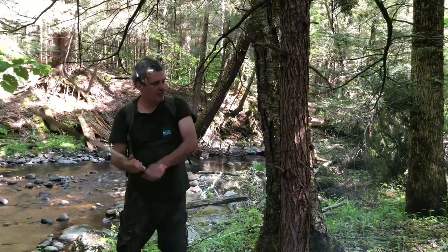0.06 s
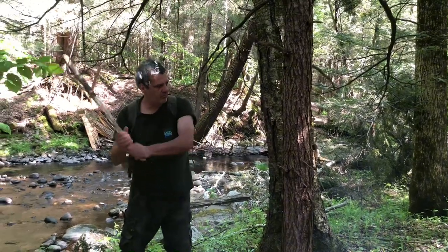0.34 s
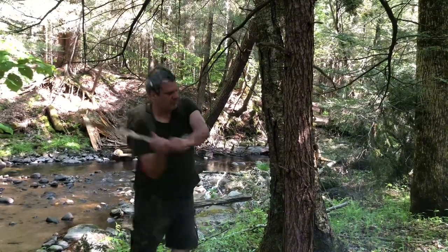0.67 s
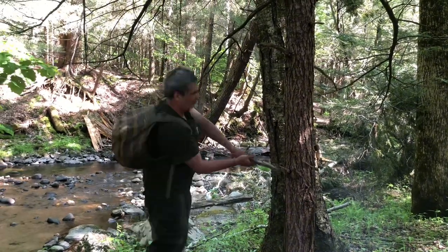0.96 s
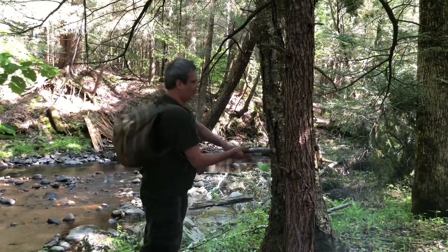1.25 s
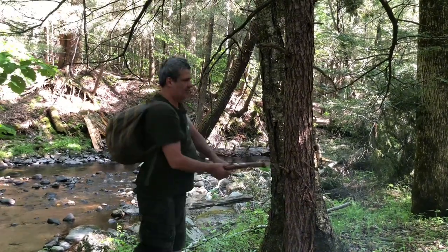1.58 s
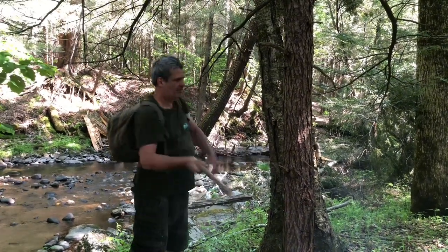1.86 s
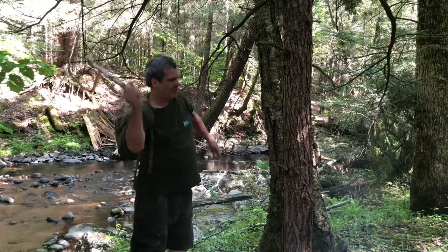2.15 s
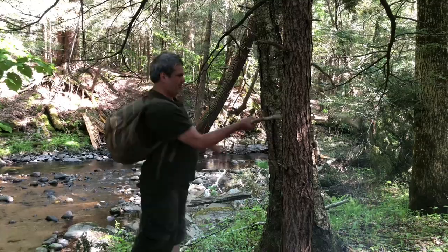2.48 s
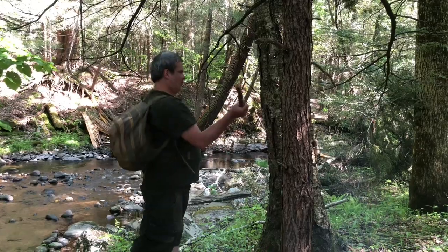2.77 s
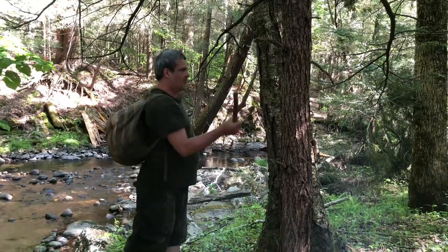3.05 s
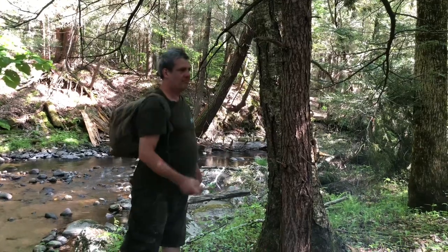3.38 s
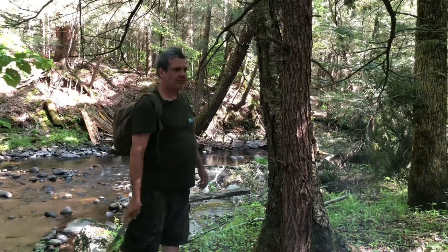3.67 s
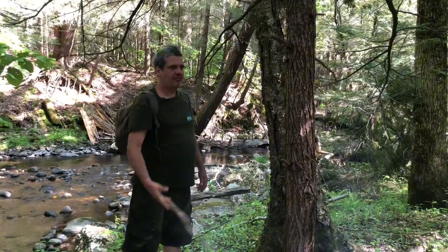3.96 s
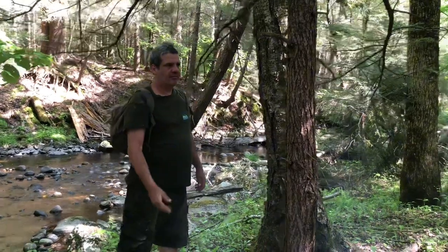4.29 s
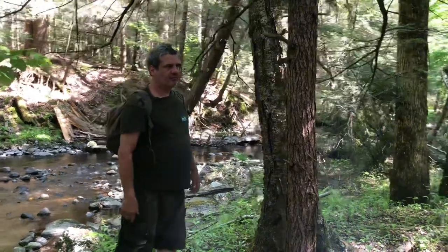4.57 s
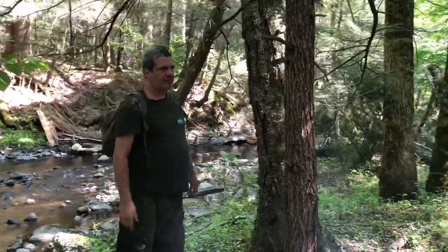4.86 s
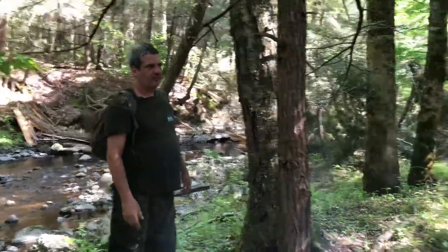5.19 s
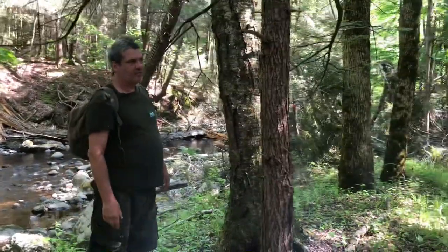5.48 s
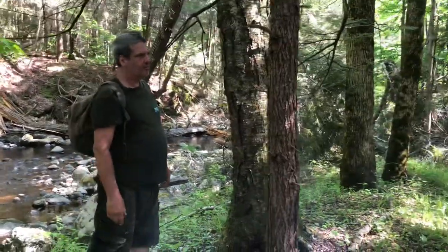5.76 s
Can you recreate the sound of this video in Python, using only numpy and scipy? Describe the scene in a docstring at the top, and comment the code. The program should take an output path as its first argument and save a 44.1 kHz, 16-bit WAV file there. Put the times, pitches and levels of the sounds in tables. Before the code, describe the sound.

Two sharp wooden knocks echo briefly in a forest, each followed by falling wood, while a stream trickles softly.

```python
"""Dead stick against a tree

A dead stick is swung twice against a trunk beside a small forest stream. Each blow cracks, rings
briefly and snaps a piece off, which lands in the leaf litter a moment later. The trunks scatter the
knocks back. Twigs and clothes rustle over a bed of ringing bubbles, watery wash and a far, low hum."""
import sys
import numpy as np
from scipy import signal
from scipy.fft import rfft, irfft, next_fast_len
from scipy.io import wavfile
from scipy.ndimage import uniform_filter1d

SR = 44100
rng = np.random.default_rng(int(sys.argv[2]) if len(sys.argv) > 2 else 0)


def to_wav(sig):
    """Store sig (one row per channel, or 1-D mono) as 16-bit WAV at the path in sys.argv[1].

    Samples outside -1..1 are clipped; the rate is SR.
    """
    pcm = np.clip(np.atleast_2d(sig), -1, 1) * 32767
    pcm = np.round(pcm).astype(np.int16)
    wavfile.write(sys.argv[1], SR, pcm.T)  # frames by channels


N = 257103
TIME = np.arange(N) / SR
LEAD = 64  # samples of soft start ahead of a crack

# Fader rides for the hum, the wash and the hiss. Each row: time in seconds, level in dB.
HUM_RIDE = [(0, -74.5), (1, -79.5), (2, -70), (3.8, -70.5), (5, -76.5), (5.83, -66.5)]
WASH_RIDE = [(0, -62.5), (.8, -63.5), (2.3, -60.5), (3.1, -61), (5.83, -61)]
HISS_RIDE = [(0, -65), (.7, -66.5), (1.7, -58), (2.1, -64), (3.1, -59), (3.9, -63), (5.1, -63.5),
             (5.83, -64.5)]
# Tone colours of the noisy layers. Each row: frequency in Hz, relative level in dB.
WASH_EQ = [(25, -27), (45, -2), (70, -10), (95, -4.5), (160, 1), (240, -2), (350, 0.5), (550, -1.5),
           (800, -1.5), (1400, 0), (2000, -4), (4000, -8), (9000, -37), (16000, -54)]
HISS_EQ = [(1500, -8), (3000, -1), (5000, 1.5), (8500, 0), (11000, -4), (16000, -11.5)]
CLOTH_EQ = [(800, -10), (2200, -2.5), (4000, -11), (6000, 1.5), (7500, 3.5), (10000, -8.5), (14000, -7),
            (16000, -15)]
LITTER_EQ = [(100, -8), (400, 3.5), (800, -6), (1500, -2.5), (2500, -4.5), (4000, -0.5), (6500, -1.5),
             (9000, -1.5), (12000, -5.5), (16000, -9.5)]
LONG_CRACK_EQ = [(100, -21), (800, -21), (1150, -31), (1530, -10), (1950, -21), (2420, 2), (2850, -9),
                 (3350, 1.5), (3900, -7.5), (4900, -1.5), (6000, -7.5), (8500, -9), (11500, -11.5),
                 (16000, -23)]
SHORT_CRACK_EQ = [(100, -33), (700, -9.5), (1300, -7), (1900, -4.5), (2600, -14.5), (3150, 1), (4400, -9.5),
                  (5900, 5.5), (7000, 0.5), (9000, -6), (11400, -5), (16000, -11)]
# The stream's big air pockets. Each row: peak in seconds, level in dB, pitch in Hz, relative splash in dB.
BIG_GURGLES = [(.325, -54, 520, -3), (.851, -54, 467, -5), (1.808, -55, 560, -7), (1.951, -50, 650, 0),
               (3.258, -47.5, 485, -8), (3.633, -46, 610, -7), (3.872, -53, 524, -4), (4.629, -53, 570, -1),
               (4.53, -55.5, 557, -4), (4.912, -50, 510, -4), (5.012, -48.5, 635, -11),
               (5.29, -52.5, 543, 3)]
# Colour of the forest's echo. Each row: frequency in Hz, level in dB.
ECHO_EQ = [(100, -20), (400, -11.5), (800, -7.5), (1000, -8.5), (1350, -7), (1900, -8), (2400, -18.5),
           (3100, -10), (4000, -10.5), (6000, -9), (9000, -9), (15000, -15)]
# Length of its tail. Each row: frequency in Hz, seconds to fall by 60 dB.
ECHO_T60 = [(100, 0.33), (800, 1), (3000, 0.95), (6000, 0.76), (10000, 0.64), (16000, 0.57)]
# Its bloom, slowest in the bass. Each row: frequency in Hz, rise in seconds.
ECHO_RISE = [(200, 0.042), (1400, .04), (3000, 0.022), (8000, 0.0077)]
# Feet and clothes shift. Each row: peak in seconds, level in dB, decay in seconds, tilt in dB per octave.
SHUFFLES = [(1.892, -49.5, .005, 9), (3.15, -50, 0.023, 2), (3.233, -46.5, 0.014, 0.5),
            (3.575, -52, 0.0097, -2.5), (3.93, -57.5, 0.04, 1.5), (3.999, -51, .006, 0),
            (4.389, -39, 0.0067, -1), (4.581, -44, 0.0042, -2), (4.698, -53, 0.018, -2),
            (4.857, -45, 0.01, -1)]
# Twigs snap, the thinner the higher. Each row: peak in seconds, level in dB, low cut in Hz.
TWIG_SNAPS = [(0.265, -48.5, 7000), (1.392, -45, 6500), (1.586, -38.5, 4520), (1.705, -45.5, 3000),
              (2.2255, -49.5, 4500), (3.122, -43.5, 5000), (4.962, -46.5, 4000), (5.438, -46, 1790)]
# A broken piece hits the leaves, then the ground under them.
# Each row: peak in seconds, level in dB, decay in seconds, low cut in Hz.
LEAF_LANDINGS = [(1.0809, -31.5, 0.033, 1490), (1.0987, -33, 0.012, 900), (1.1061, -21.5, 0.0026, 250),
                 (1.1104, -26.5, 0.0049, 300), (2.806, -44, 0.005, 500), (2.8197, -30.5, 0.0063, 2570)]
# Wood and feet on soft soil. Each row: start in seconds, level in dB, pitch in Hz, decay in seconds.
SOIL_THUMPS = [(0.8964, -44, 220, 0.017), (1.107, -34, 340, 0.0031), (1.114, -47.5, 188, 0.017),
               (2.5065, -31, 500, 0.0021), (2.8078, -27.5, 263, 0.0042), (2.8145, -32.5, 160, 0.0083),
               (4.586, -51, 169, 0.013)]
# Modes of the trunk, and bending modes of the stick at each length.
# Each row: pitch in Hz, relative level in dB, seconds to fall by 60 dB.
TRUNK_RING = [(77, -4, 0.18), (127, -3, 0.12), (187, -5, 0.12), (242, -1.5, 0.077), (349, 2.5, 0.03),
              (513, -8, 0.026)]
LONG_RING = [(792, -13, 0.085), (960, -16, 0.034), (1063, 1, 0.034), (1132, -1.5, 0.047), (1280, -8, 0.06),
             (1340, -4.5, 0.063), (1620, -18, 0.079), (1960, -21, .07), (2400, -17, 0.056),
             (3420, -24, .04)]
SHORT_RING = [(540, -16, 0.036), (788, -4.5, .075), (826, -1.5, 0.03), (1010, -13, 0.04), (1305, -6, 0.047),
              (1380, -9.5, 0.062), (1550, -19, 0.037), (2090, -25, .04), (3150, -21, .025)]
# Contacts and snaps within each blow. Each row: start in seconds, crack level in dB, crack decay in
# seconds, crack tilt in dB per octave, ring gain in dB, ring tilt in dB per octave, trunk gain in dB.
LONG_HITS = [(.8743, -19.5, .0012, -1, -45, 6, -73), (.8868, -32, 0.0076, 7, -42, -6, -51),
             (.8953, -33, .0015, -7, -40, -5, -37.5), (.8965, -28.5, .0015, 3.5, -26, 1, -60)]
SHORT_HITS = [(2.4507, -19.5, 0.00092, -1.2, -36, 8, -75), (2.4538, -46, .003, -7, -28, -7, -43.5),
              (2.467, -36, 0.02, -6, -35.5, 2, -49), (2.4735, -38, 0.0036, 7, -30, 3, -38),
              (2.5027, -32, 0.0012, -1, -49, 13, -66)]


def amp(db):
    """Decibels to gain."""
    return 10 ** (np.asarray(db) / 20)


def unit(x):
    """Scales to rms 1."""
    return x / np.sqrt(np.mean(x ** 2) + 1e-20)


def read(points, hz):
    """Reads a curve on a log-frequency axis."""
    f, value = np.transpose(points)
    return np.interp(np.log(hz + 1), np.log(f), value)


def fader(ride):
    """Gain at every sample of a fader ride."""
    return amp(np.interp(TIME, *np.transpose(ride)))


def add(mix, s, sound):
    """Mixes a sound in at s seconds."""
    start = round(s * SR)
    sound = sound[max(-start, 0):]
    part = mix[max(start, 0):][:len(sound)]
    part += sound[:len(part)]


def eq_gains(eq, size, tilt_db):
    """Gain of each FFT bin: an EQ curve, tilted in dB per octave above 500 Hz."""
    hz = np.fft.rfftfreq(size, 1 / SR)
    return amp(read(eq, hz) + tilt_db * np.log2(np.maximum(hz, 500)))


def colour(x, eq, tilt_db=0):
    """Runs noise through an EQ curve and brings it to rms 1."""
    size = next_fast_len(len(x))
    return unit(irfft(rfft(x, size) * eq_gains(eq, size, tilt_db), size)[:len(x)])


def burst(sound, envelope):
    """A sound under an envelope, with the energy of that envelope."""
    return unit(sound * envelope) * np.sqrt(np.mean(envelope ** 2))


def grain(size, grain_db, limit):
    """Uneven gains that roughen a texture: many small grains, a few big ones."""
    return amp(grain_db * np.minimum(rng.exponential(1, size), limit))


def hum(hum_hz=119, waver_hz=3, rumble_db=-73):
    """A far, wavering hum over a narrow rumble."""
    drift = unit(uniform_filter1d(uniform_filter1d(rng.standard_normal(N), size=4000), size=4000))
    tone = np.sqrt(2) * np.sin(2 * np.pi * np.cumsum(hum_hz + waver_hz * drift) / SR)
    rumble = colour(rng.standard_normal(N), [(40, -18), (70, -8.5), (105, -12), (250, -56)])
    return fader(HUM_RIDE) * tone + amp(rumble_db) * rumble


def wash():
    """The broad wash of the stream's riffles."""
    return fader(WASH_RIDE) * colour(rng.standard_normal(N), WASH_EQ)


def hiss(smooth_db=-1.5, ticks_db=-7, ticks_per_s=70, tick_decay_s=0.00094):
    """A fine, ticking high hiss of water and rustling clothes, ridden up where the person moves."""
    onsets = (rng.random(N) < ticks_per_s / SR) * grain(N, grain_db=3.5, limit=3)
    ticks = signal.lfilter([1], [1, -np.exp(-1 / (tick_decay_s * SR))], onsets) * rng.standard_normal(N)
    smooth = amp(smooth_db) * colour(rng.standard_normal(N), HISS_EQ)
    return fader(HISS_RIDE) * (smooth + amp(ticks_db) * colour(ticks, HISS_EQ, tilt_db=1.5))


def babble(count=1400, db=-67, lowest_hz=480, octaves=1.67, cycles=4, glide=0.078, spread_db=3, tilt_db=-4):
    """Countless small bubbles; the smaller they are, the higher, shorter and fainter they ring."""
    when, smallness, chance = rng.random((count, 3)).T[:, :, None]
    step = np.arange(SR // 40)
    turns = lowest_hz * 2 ** (octaves * smallness) * step / SR
    age = turns / cycles
    gain = amp(tilt_db * octaves * smallness - spread_db * np.log(np.maximum(chance, .08)))
    chirps = np.sin(2 * np.pi * turns * (1 + glide * age / (1 + age)))
    bubbles = gain * age * np.exp(-2 * age) * chirps
    at = (when * N).astype(int) + step
    return amp(db) * unit(np.bincount(at.ravel(), bubbles.ravel(), N)[:N])


def gurgles(swell_cycles=3.85, glide=0.0504, count=22, faint_db=-58, faint_hz=520, spread_octaves=0.132):
    """A pocket of air rings with rising pitch in a splash of small bubbles; faint ones burst at random."""
    out, t = np.zeros(N), np.arange(-SR // 20, SR // 20) / SR
    faint = [(when * N / SR, faint_db, faint_hz * 2 ** (spread_octaves * (2 * pitch - 1)), -4)
             for when, pitch in rng.random((count, 2))]
    for s, db, hz, splash_db in list(BIG_GURGLES) + faint:
        swell_s = swell_cycles / hz
        rising_hz = hz * (1 + glide * np.tanh(t / swell_s))
        bubble = np.sqrt(2) * np.sin(2 * np.pi * (np.cumsum(rising_hz) / SR + rng.random()))
        splash_eq = [(hz / 4, -20), (hz, 0), (hz * 1.3, -7), (hz * 2.73, -8), (hz * 6, -35)]
        splash = amp(splash_db) * colour(rng.standard_normal(len(t)), splash_eq)
        add(out, s + t[0], amp(db) * burst(bubble + splash, np.exp(-(t / swell_s) ** 2)))
    return out


def forest(send, near_db=-12, near_decay_s=0.0083, near_low_hz=2800):
    """Twigs and bark nearby scatter the treble at once; far trunks return a long tail."""
    t = np.arange(SR) / SR
    hz, when, noise = signal.stft(rng.standard_normal(SR), SR, nperseg=256)
    t60, rise = read(ECHO_T60, hz)[:, None], read(ECHO_RISE, hz)[:, None]
    fade = amp(read(ECHO_EQ, hz)[:, None] - 60 * when / t60)
    trim = np.sqrt(2 * np.log(1000) / (t60 * SR))  # evens out the energy of long and short tails
    bloom = 1 - np.exp(-(when / rise) ** 2)
    far = signal.istft(noise * fade * trim * bloom, SR, nperseg=256)[1][:SR]
    scatter = signal.lfilter(*signal.butter(2, near_low_hz, "highpass", fs=SR), rng.standard_normal(SR))
    near = unit(scatter * t * np.exp(-t / near_decay_s)) / np.sqrt(SR)
    return signal.fftconvolve(send, far + amp(near_db) * near)[:N]


def sleeve(peak_s=5.44, db=-55, fade_s=0.16):
    """Cloth slides over cloth in one soft, grainy swell."""
    threads = rng.standard_normal(N) * grain(N, grain_db=4, limit=5)
    return amp(db) * np.exp(-abs(TIME - peak_s) / fade_s) * colour(threads, CLOTH_EQ)


def crunch(mix, peak_s, db, rise_s, decay_s, tilt_db, low_hz):
    """Mixes in a swarm of tiny snaps that swells and dies; small things lack the low end."""
    t = np.arange(-SR // 10, SR // 5) / SR
    snaps = rng.standard_normal(len(t)) * grain(len(t), grain_db=4.5, limit=4)
    snaps = signal.lfilter(*signal.butter(2, low_hz, "highpass", fs=SR), snaps)
    envelope = np.exp(-(np.minimum(t, 0) / rise_s) ** 2 - np.maximum(t, 0) / decay_s)
    add(mix, peak_s + t[0], amp(db) * burst(colour(snaps, LITTER_EQ, tilt_db), envelope))


def rustles():
    """Landing pieces, scraped bark, twigs and shifting feet all crunch, each with its own envelope."""
    out = np.zeros(N)
    for s, db, decay_s, low_hz in LEAF_LANDINGS:
        crunch(out, s, db, rise_s=.0013, decay_s=decay_s, tilt_db=2.35, low_hz=low_hz)
    # the stick drags off the bark once, biting quickly and letting go slowly
    crunch(out, peak_s=1.524, db=-38.5, rise_s=0.011, decay_s=.045, tilt_db=1.7, low_hz=1200)
    for s, db, low_hz in TWIG_SNAPS:
        crunch(out, s, db, rise_s=.0008, decay_s=0.0018, tilt_db=-3, low_hz=low_hz)
    for s, db, decay_s, tilt_db in SHUFFLES:
        crunch(out, s, db, rise_s=decay_s, decay_s=decay_s, tilt_db=tilt_db, low_hz=2980)
    return out


def thumps(rise_s=0.00054):
    """Soft soil damps a landing piece or a foot within a few cycles."""
    out, t = np.zeros(N), np.arange(SR // 6) / SR
    for s, db, hz, decay_s in SOIL_THUMPS:
        envelope = (1 - np.exp(-t / rise_s)) * np.exp(-t / decay_s)
        add(out, s, amp(db) * envelope * np.sin(2 * np.pi * hz * t))
    return out


def ring(modes, t, contact_s=0.0015):
    """The body of a knock: a short contact pushes the wood into decaying modes."""
    tones = sum(amp(db - 60 * t / t60) * np.sin(2 * np.pi * hz * t) for hz, db, t60 in modes)
    return (1 - np.exp(-t / contact_s)) * tones


def crack(envelope, eq, tilt_db):
    """The bite of a knock: fibres break at random moments, with a smooth spectrum and a soft start."""
    size = len(envelope)
    envelope = np.pad(envelope, (LEAD, 0))[:size]
    fibres = rng.standard_normal(size) * envelope
    timing = np.exp(1j * np.angle(rfft(fibres)))  # phase only, so the EQ alone sets the colour
    snap = irfft(timing * eq_gains(eq, size, tilt_db), size)
    edges = np.minimum(np.arange(size) / LEAD, 1) * np.minimum(np.linspace(2, 0, size), 1)
    return unit(snap * edges ** 2) * np.sqrt(np.mean(envelope ** 2))


def stick(hits, crack_eq, modes, rise_s, splinter_s, splinter_db=-25):
    """Bark and dry fibres crack, the stick rings and the trunk thuds. Two stems: cracks and ringing."""
    cracks, ringing, t = np.zeros(N), np.zeros(N), np.arange(SR // 4) / SR
    trunk = ring(TRUNK_RING, t)
    attack = np.minimum(t / rise_s, 1)
    splinters = amp(splinter_db) * np.exp(-t / splinter_s)
    for s, crack_db, decay_s, tilt_db, ring_db, hardness_db, thud_db in hits:
        crush = np.exp(-np.maximum(t - 2 * rise_s, 0) / decay_s)
        add(cracks, s - LEAD / SR, amp(crack_db) * crack(attack * (crush + splinters), crack_eq, tilt_db))
        # a harder contact favours the higher modes
        wood = ring([(hz, db + hardness_db * np.log2(hz / 1000), t60) for hz, db, t60 in modes], t)
        add(ringing, s, amp(ring_db) * wood + amp(thud_db) * trunk)
    return cracks, ringing


def scene():
    """Knocks and foley over the background bed; each stem has its own send to the forest echo."""
    long_crack, long_ring = stick(LONG_HITS, LONG_CRACK_EQ, LONG_RING, rise_s=0.00081, splinter_s=0.014)
    short_crack, short_ring = stick(SHORT_HITS, SHORT_CRACK_EQ, SHORT_RING,
                                    rise_s=0.0004, splinter_s=0.0086)
    foley = rustles() + sleeve() + thumps()
    stems = np.array([long_crack, long_ring, short_crack, short_ring, foley])
    sends_db = [0, -9, 1, 0, -3]
    echo = forest(amp(sends_db) @ stems)
    bed = wash() + hiss() + babble() + gurgles() + hum()
    return (stems.sum(0) + echo + bed)[None]


def record(dry):
    """The microphone loses the deep bass; a steep high cut takes off the very top."""
    low_cut_hz, high_cut_hz = 54, 16050
    thin = signal.sosfilt(signal.butter(4, low_cut_hz, "highpass", fs=SR, output="sos"), dry)
    high_cut = signal.firwin(511, high_cut_hz, window=("kaiser", 9), fs=SR)
    return signal.oaconvolve(thin, high_cut[None], "same")


dry = scene()
out = record(dry)
to_wav(out)
```